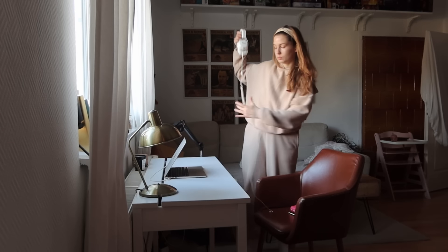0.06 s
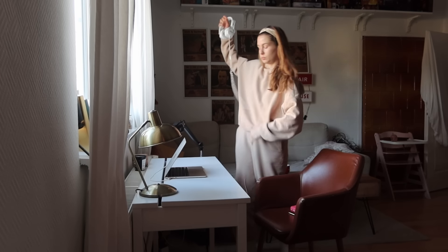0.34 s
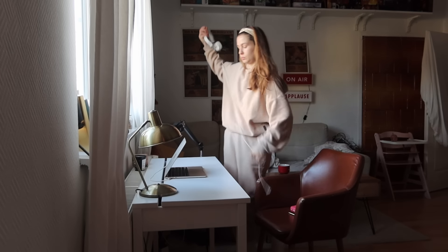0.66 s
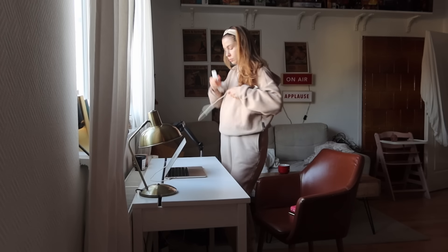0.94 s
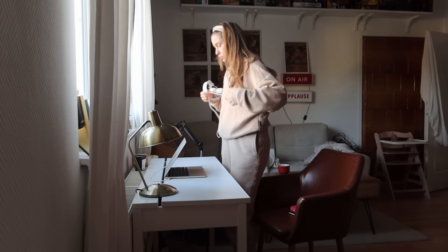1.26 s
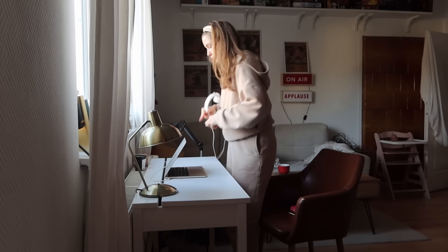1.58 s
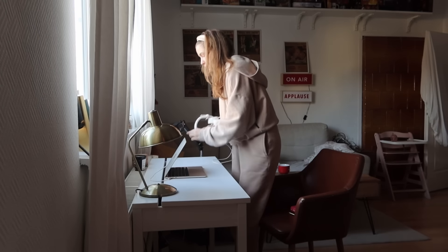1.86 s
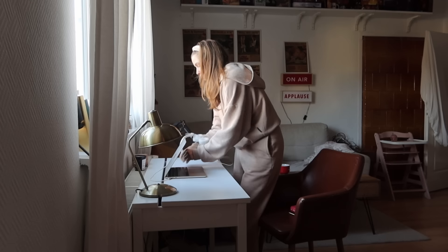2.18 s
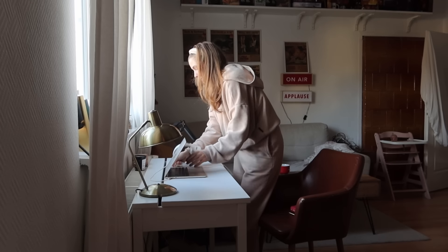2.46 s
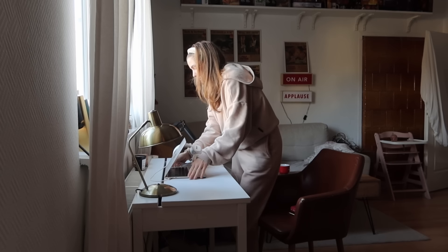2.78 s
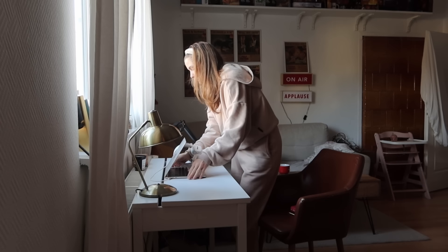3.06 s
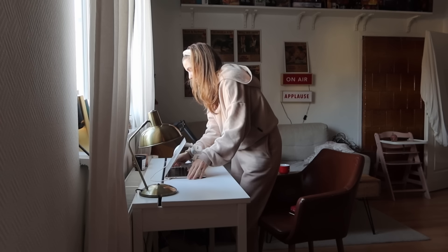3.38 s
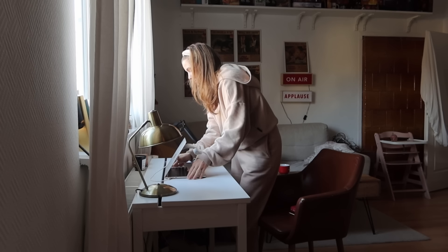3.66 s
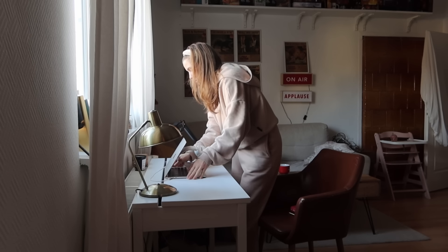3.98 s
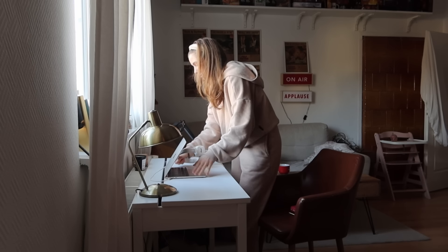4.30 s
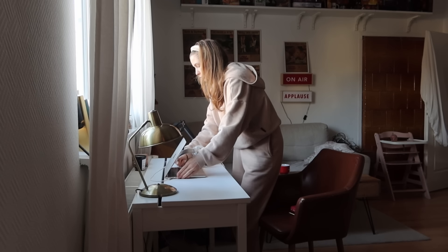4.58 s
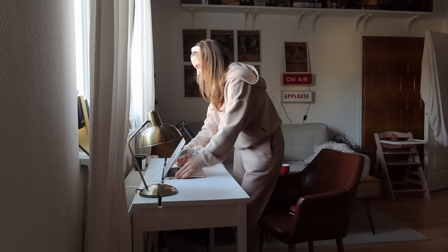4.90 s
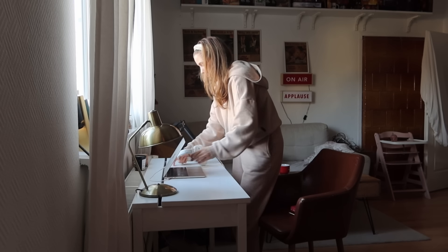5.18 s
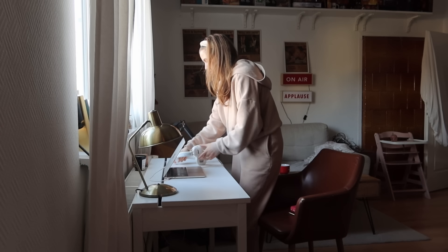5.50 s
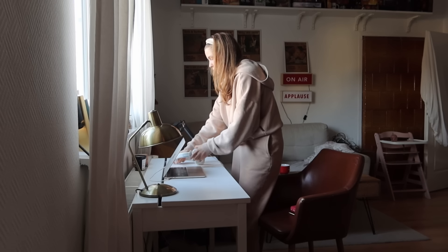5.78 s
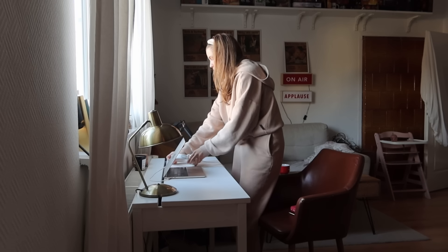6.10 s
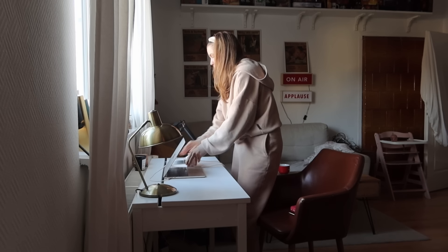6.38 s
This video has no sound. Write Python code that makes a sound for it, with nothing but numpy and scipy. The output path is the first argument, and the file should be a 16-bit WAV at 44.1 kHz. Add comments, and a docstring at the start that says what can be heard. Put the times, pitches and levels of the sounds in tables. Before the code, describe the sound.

Scattered plastic clicks and one sharp knock on a desk, followed by soft laptop thuds, short slides and sleeve rustles over faint hiss.

```python
"""Headphones and a laptop on a wooden desk.

Plastic headphones on a cord click as they are turned in the hands, then meet the desk in one sharp knock.
A laptop is nudged, dropped on its rubber feet a few times and slid over the desk top.
Impacts excite damped modes of plastic and wood; friction drives the slides and rustling sleeves.
A small furnished room reverberates, over the steady hiss of a distant microphone."""
import sys
import numpy as np
from scipy import signal
from scipy.fft import rfft, irfft, next_fast_len
from scipy.io import wavfile

SR = 44100
rng = np.random.default_rng(int(sys.argv[2]) if len(sys.argv) > 2 else 0)


def int16_out(signal):
    """Quantize to a 16-bit WAV file."""
    q = np.round(np.clip(np.atleast_2d(signal).T, -1, 1) * 32767)
    wavfile.write(sys.argv[1], SR, q.astype(np.int16))


N = 284445
AGE = np.arange(SR // 2) / SR  # time since a contact [s]


def amp(db):
    """The decibel scale: 20 dB is a factor of ten in amplitude."""
    return 10 ** (np.asarray(db) / 20)


def unit(x):
    """Normalisation to an rms of 1."""
    return x / np.sqrt(np.mean(x ** 2) + 1e-20)


def fade(t60, t=AGE):
    """Exponential decay: 60 dB in t60 seconds."""
    return np.exp(-np.log(1000) * t / t60)


def add(track, time, sound):
    """Superposition: a sound joins the track at the given time."""
    start = round(time * SR)
    track[start:start + len(sound)] += sound[:max(N - start, 0)]


def along(points, hz):
    """Interpolation of (frequency, value) points on a logarithmic frequency axis."""
    frequencies, values = np.transpose(points)
    return np.interp(np.log(hz + 1), np.log(frequencies + 1), values)


def coloured(x, spectrum):
    """Minimum-phase filtering: folding the cepstrum gives a causal response with this spectrum."""
    size = next_fast_len(len(x) + 8192, True)
    size += size % 2
    gain = amp(along(spectrum, np.fft.rfftfreq(size, 1 / SR)))
    cepstrum = irfft(np.log(gain), size)
    cepstrum[1:size // 2] *= 2
    cepstrum[size // 2 + 1:] = 0
    return irfft(rfft(x, size) * np.exp(rfft(cepstrum)), size)[:len(x)]


def tilted(rows, db_per_octave, knee_hz):
    """Contact hardness: above the knee, softer contacts lose level and harder ones gain it."""
    return [(hz, db + db_per_octave * max(np.log2(hz / knee_hz), 0), *rest) for hz, db, *rest in rows]


def ring(modes, attack):
    """Modal vibration: a sum of damped sinusoids, struck a little differently each time."""
    chance_db = rng.standard_normal(len(modes))
    waves = [(-1) ** k * amp(db + chance_db[k]) * fade(t60) * np.sin(2 * np.pi * hz * AGE)
             for k, (hz, db, t60) in enumerate(modes)]
    return sum(waves) * (1 - np.exp(-AGE / attack))


def grains(rate, spread_db):
    """Friction as shot noise: tiny slips of uneven size at random times."""
    slips = (rng.random(N) < rate / SR) * rng.standard_normal(N)
    return unit(slips * amp(spread_db * rng.standard_normal(N)))


def strokes(rows, column, attack=0.052, t60=0.36, lurch_db=0, lurch_hz=9.2):
    """Amplitude envelope from one level column: each stroke rises, holds and decays, and may lurch."""
    gain = np.zeros(N)
    for row in rows:
        start, length = row[:2]
        age = np.maximum(np.arange(N) / SR - start, 0)
        envelope = np.minimum(age / attack, 1) * fade(t60, np.maximum(age - length, 0))
        lurch = lurch_db * np.cos(2 * np.pi * lurch_hz * (age - attack))
        gain += envelope * amp(row[column] + lurch)
    return gain


# background spectrum (frequency [Hz], level [dB])
NOISE_FLOOR = [(15, -71), (25, -4.5), (80, -2.5), (192, -6.5), (256, -5), (276, -8), (306, -2), (418, -10),
               (513, -7), (700, -7), (883, -10), (1030, -10.5), (1370, -12.5), (5670, -16), (12000, -20.5),
               (15600, -97), (22000, -120)]


def room_tone(level_db=-57):
    """Stationary noise: room rumble and microphone hiss."""
    return amp(level_db) * unit(coloured(rng.standard_normal(N), NOISE_FLOOR))


# reverberation time of the room (frequency [Hz], t60 [s])
ROOM_DECAY = [(120, 0.53), (400, 0.27), (1500, 0.41), (4500, 0.29), (8000, 0.31), (12000, 0.25)]


def room_tail(build_s=0.006):
    """Diffuse reverberation of energy 1: reflections build up, then each band decays at its own rate."""
    hz, t, bands = signal.stft(rng.standard_normal(len(AGE)), SR, nperseg=256)
    decay = fade(along(ROOM_DECAY, hz)[:, None], t)
    tail = signal.istft(bands * decay, SR, nperseg=256)[1][:len(AGE)]
    tail *= 1 - np.exp(-(AGE / build_s) ** 2)
    return tail / np.linalg.norm(tail)


def in_room(x, wet_db):
    """Convolution with the room's response adds reverberation to the direct sound."""
    return x + amp(wet_db) * signal.fftconvolve(x, room_tail())[:len(x)]


def burst(spectrum, t60, snap, wet_db):
    """Impact transient of energy 1: an impulse, a dense short rattle, then the room's diffuse tail."""
    direct = unit(rng.standard_normal(len(AGE)) * fade(t60)) / np.sqrt(len(AGE))
    direct[0] += snap
    sound = coloured(direct / np.linalg.norm(direct) + amp(wet_db) * room_tail(), spectrum)
    return sound / np.linalg.norm(sound)


# spectra of rubbing hands and cord, and of fabric (frequency [Hz], level [dB])
RUB_SPECTRUM = [(80, -33), (150, 0.5), (230, 11), (330, 7.5), (600, -41), (2000, -39)]
CLOTH_SPECTRUM = [(150, -12), (400, -5), (730, -6), (1100, -8.5), (1600, -8), (2500, -14.5), (5000, -11.5),
                  (9000, -21.5), (12000, -28)]
# arm movements (time [s], duration [s], rub level [dB], rustle level [dB])
ARM_MOVES = [(0.3, 0.25, -56, -56), (0.53, 0.18, -67, -59.5), (1.6, .14, -78, -58),
             (2.35, 0.11, -64, -54.5), (3.02, 0.098, -62, -68.5), (3.69, 0.089, -56, -56),
             (3.9, 0.017, -57, -48)]


def sleeves(level_db=1):
    """Sliding friction: hands and cord rub dully, and soft fabric brushes in dense small grains."""
    rub = unit(coloured(grains(rate=600, spread_db=2), RUB_SPECTRUM))
    rustle = unit(coloured(grains(rate=5900, spread_db=-0.5), CLOTH_SPECTRUM))
    rub *= strokes(ARM_MOVES, column=2)
    rustle *= strokes(ARM_MOVES, column=3)
    return amp(level_db) * in_room(rub + rustle, wet_db=-13)


# spectrum of the hollow ear cup (frequency [Hz], level [dB])
CUP_SPECTRUM = [(80, -47), (200, 1), (350, -1), (550, 1), (770, 1), (1050, -8), (1500, -11), (2100, -13.5),
                (3000, -13), (6000, -49.5)]
# fingers rubbing over the cup (time [s], duration [s], level [dB])
FINGER_RUBS = [(1.55, 0.16, -54), (2.38, 0.049, -50.5), (3.06, 0.051, -57)]


def cup_rub():
    """Cavity resonance: small slips of the fingers sound the hollow cup."""
    rub = unit(coloured(grains(rate=2000, spread_db=2.5), CUP_SPECTRUM))
    return rub * strokes(FINGER_RUBS, column=2)


# spectrum of a plastic tick (frequency [Hz], level [dB])
TICK_SPECTRUM = [(300, -45), (1500, -2), (2700, -4), (3600, 6.5), (4700, 8.5), (6300, 3.5), (9000, 0.5),
                 (11500, -5)]
# modes of ear cup and headband (frequency [Hz], level [dB], t60 [s])
SHELL_MODES = [(537, -12, 0.1), (756.3, -5, 0.067), (1070, -36, 0.072), (1037, -17.5, 0.16),
               (1178, -23, 0.14), (1277, -23, 0.22), (1420, -13.5, 0.064)]


def click(tick_db, tick_hz, cup_db, plain_tick_db=-10.5):
    """Impact excitation: a contact ticks in the plastic and sounds the hollow shell behind it."""
    hardness = 0.29 * (tick_db - plain_tick_db)  # a stronger tick is harder and brighter
    spectrum = tilted(TICK_SPECTRUM, hardness, knee_hz=4400)
    crack = burst(spectrum, t60=0.027, snap=0.26, wet_db=-3)
    ping = fade(t60=0.0051) * np.sin(2 * np.pi * tick_hz * AGE)
    ping /= np.linalg.norm(ping)
    plastic = amp(tick_db + 7) * crack + amp(tick_db + 1.5) * ping
    # the larger, slower parts ring on after the tick
    hollow = amp(cup_db + 20) * burst(CUP_SPECTRUM, t60=0.051, snap=0.27, wet_db=2.5)
    shell = amp(cup_db + 1) * ring(SHELL_MODES, attack=0.00053)
    return plastic + hollow + shell


# modes of the laptop standing on the desk (frequency [Hz], level [dB], t60 [s])
LAPTOP_MODES = [(132, -27.5, 0.9), (188.3, -14, 0.3), (194.8, -13, 0.25), (263.3, -9, 0.29), (333, 0, 0.22),
                (368.8, -3.5, 0.14), (439, -17, 0.25), (485.5, -16, 0.35), (555.5, -5, 0.12),
                (623, -10.5, 0.21), (725, -12, 0.13), (910, -25.5, 0.056), (1233, -21, 0.047),
                (1456, -26.5, 0.1)]
# spectra of the sideways drive and of rubber scuffing wood (frequency [Hz], level [dB])
SLIP_SPECTRUM = [(80, -14), (130, 8), (200, 12.5), (270, 1), (370, 2), (550, -7.5), (900, -11), (2000, -3)]
SCUFF_SPECTRUM = [(150, 1), (350, -1), (750, 10.5), (1100, -0.5), (1600, 0), (2200, -6.5), (3300, -5.5),
                  (5000, -19), (8000, -28.5), (12000, -39)]
# pushes on the laptop (time [s], duration [s], judder level [dB], scrape level [dB])
PUSHES = [(3.976, 0.033, -41, -47), (4.158, 0.06, -46.5, -44.5), (5.772, 0.14, -49, -58),
          (5.995, 0.063, -38.5, -58.5), (6.095, .215, -37.5, -53)]


def laptop_slide(judder_db=-1):
    """Stick-slip friction: the slipping feet shake the laptop's body and scrape on the wood."""
    # the hands damp the body, and a sideways push gives a low judder, strongest near 200 Hz
    body = coloured(ring(LAPTOP_MODES, attack=0.0026) * fade(t60=0.16), SLIP_SPECTRUM)
    judder = unit(signal.fftconvolve(grains(rate=920, spread_db=-1.5), body)[:N])
    scrape = unit(coloured(grains(rate=1000, spread_db=-2.5), SCUFF_SPECTRUM))
    push = dict(attack=0.012, t60=0.22, lurch_db=1)  # the feet grip and let go within a push
    judder *= strokes(PUSHES, column=2, **push)
    scrape *= strokes(PUSHES, column=3, **push)
    return amp(judder_db) * judder + in_room(scrape, wet_db=-4.5)


# spectrum of the desk's boom (frequency [Hz], level [dB])
BOOM_SPECTRUM = [(50, -2), (90, -6), (125, -1.5), (200, -2), (300, -3), (420, -4), (620, -5), (850, -18.5),
                 (1500, -26), (3000, -92)]
# feet landing (time [s], thud level [dB], scuff level [dB], hardness [dB/octave], case tick level [dB])
LANDINGS = [(4.0114, -23, -33.5, 1, -36), (4.124, -47.5, -36.5, 12.5, -52), (4.368, -20, -38.5, 3, -34),
            (4.666, -18, -33, -1, -59), (4.955, -38, -54, -3.5, -56)]


def laptop_feet():
    """Cushioned impact: rubber feet thud and the desk booms, with a faint scuff and a tick of the case."""
    track = np.zeros(N)
    for time, thud_db, scuff_db, hardness, tick_db in LANDINGS:
        modes = tilted(LAPTOP_MODES, hardness, knee_hz=343)
        spectrum = tilted(BOOM_SPECTRUM, hardness, knee_hz=338)
        body = amp(thud_db - 3) * ring(modes, attack=0.0005)
        boom = amp(thud_db + 16) * burst(spectrum, t60=0.04, snap=1.4, wet_db=8)
        scuff = amp(scuff_db + 20) * burst(SCUFF_SPECTRUM, t60=0.072, snap=0.14, wet_db=2)
        case = click(tick_db, tick_hz=4700, cup_db=scuff_db - 8)
        add(track, time, body + boom + scuff + case)
    return track


# modes of the desk top (frequency [Hz], level [dB], t60 [s])
DESK_MODES = [(124.2, 1, 0.2), (152.9, -8, 0.53), (173.5, -8.5, 0.45), (205, -13, 0.45), (264, -0.5, 0.23),
              (302, -7, 0.27), (335.5, 6, 0.11), (523.4, 7, 0.12), (548, -5.5, 0.23)]
# headphones and plug in the hands (time [s], tick level [dB], tick frequency [Hz], cup level [dB])
CLICKS_IN_HAND = [(0.3558, -36.5, 3590, -42), (0.6523, -39, 6000, -37.5), (0.699, -32.5, 3700, -55),
                  (1.0898, -29, 3650, -37.5), (1.1711, -19.5, 5100, -44), (1.195, -48, 4540, -40),
                  (1.3192, -33, 6460, -42), (1.696, -26.5, 3640, -35.5), (1.7073, -38, 3590, -50),
                  (1.8513, -31.5, 4150, -44)]
# headphones, plug and laptop case knocking or catching on the desk
# (time [s], tick level [dB], tick frequency [Hz], cup level [dB], desk level [dB])
DESK_KNOCKS = [(2.298, -49, 4070, -38.5, -62), (2.3451, -28, 5470, -34, -60), (2.3534, -25, 4070, -34, -75),
               (2.4505, -39, 3730, -34, -49), (2.4692, -50, 4090, -48, -44),
               (2.5583, -26.5, 3490, -25.5, -36.5), (2.5749, -4, 4600, -17.5, -20.5),
               (2.5836, -30, 4730, -47, -31.5), (2.9166, -25, 5000, -38.5, -40),
               (3.6718, -26, 4600, -38, -40.5), (3.776, -18.5, 5250, -30, -40),
               (3.8, -18, 4580, -35.5, -38.5), (4.7949, -11, 4800, -32.5, -46),
               (5.0924, -39, 5100, -40, -65), (5.915, -48, 4500, -42.5, -53), (6.0306, -37, 3850, -54, -57),
               (6.125, -36.5, 4200, -40.5, -61), (6.208, -41, 4100, -42, -50),
               (6.385, -56, 5070, -45, -50.5)]


def headphones():
    """Mechanical coupling: in the hands only the plastic sounds; a knock also shakes the wooden desk."""
    track = np.zeros(N)
    for time, tick_db, tick_hz, cup_db in CLICKS_IN_HAND:
        add(track, time, click(tick_db, tick_hz, cup_db))
    for time, tick_db, tick_hz, cup_db, desk_db in DESK_KNOCKS:
        wood = amp(desk_db - 1) * ring(DESK_MODES, attack=0.018)
        boom = amp(desk_db + 22) * burst(BOOM_SPECTRUM, t60=0.11, snap=0.34, wet_db=0)
        add(track, time, click(tick_db, tick_hz, cup_db) + wood + boom)
    return track


def scene(low_cut_hz=110):
    """Superposition at one microphone; a low cut takes the deep bass out of all the handling sounds."""
    handling = headphones() + laptop_feet() + laptop_slide() + sleeves() + cup_rub()
    low_cut = signal.butter(2, low_cut_hz, "highpass", fs=SR, output="sos")
    return (room_tone() + signal.sosfilt(low_cut, handling))[None]


def record(dry):
    """Band limiting: the spectrum falls steeply above 12 kHz."""
    size = next_fast_len(N + 8192)
    hz = np.fft.rfftfreq(size, 1 / SR)
    loss_db = np.logaddexp(0, (hz - 12000) / 10)
    return irfft(rfft(dry, size) * amp(-loss_db), size)[:, :N]


dry = scene()
out = record(dry)
int16_out(out)
```